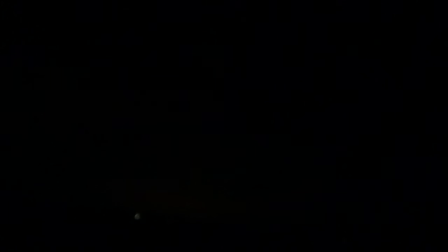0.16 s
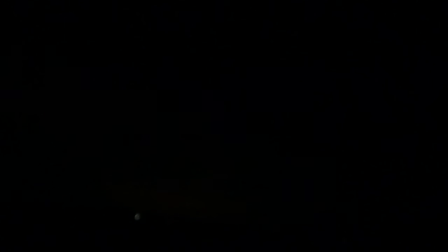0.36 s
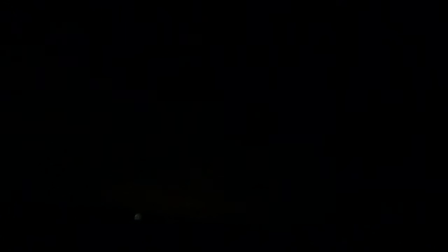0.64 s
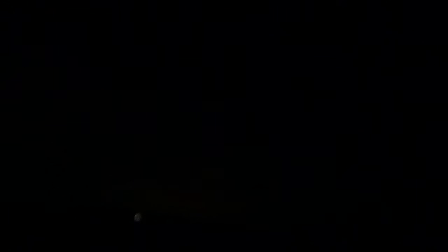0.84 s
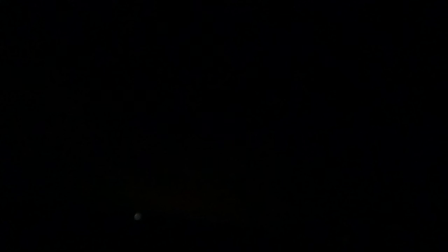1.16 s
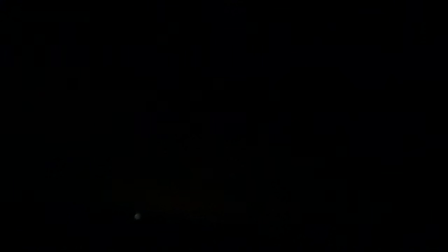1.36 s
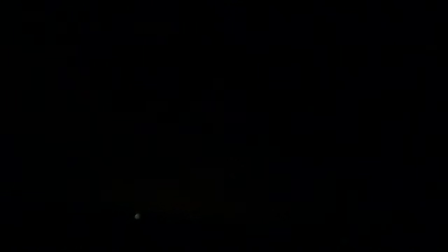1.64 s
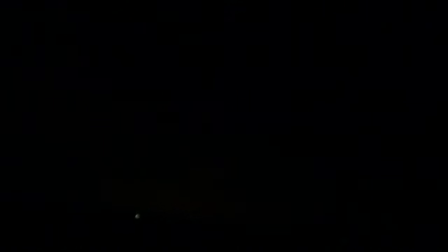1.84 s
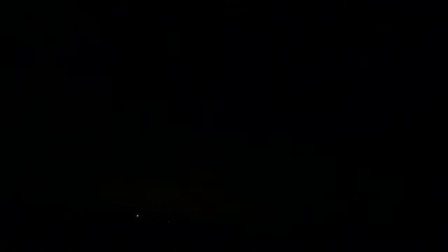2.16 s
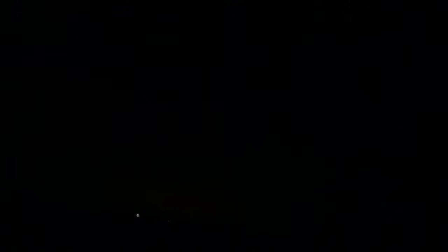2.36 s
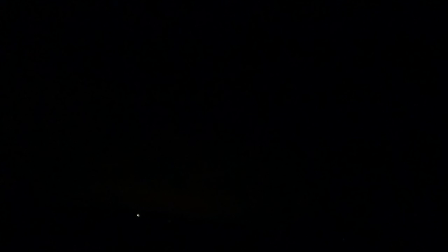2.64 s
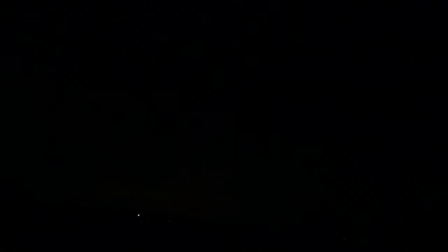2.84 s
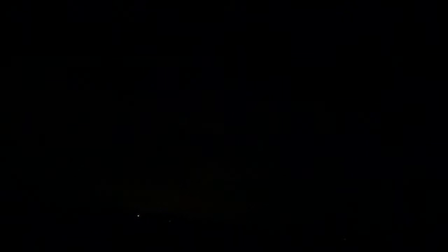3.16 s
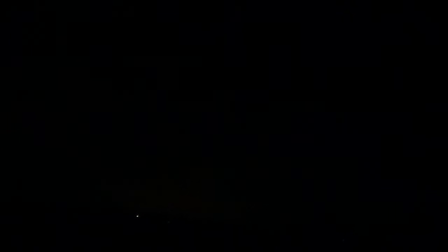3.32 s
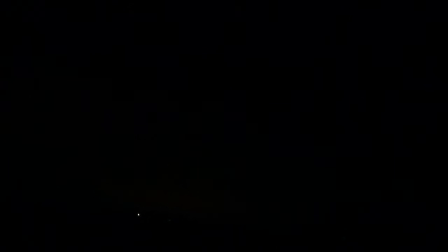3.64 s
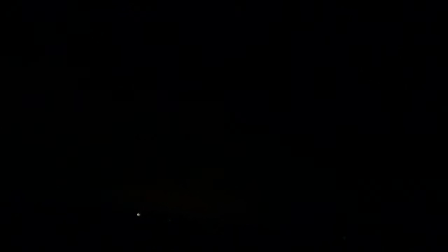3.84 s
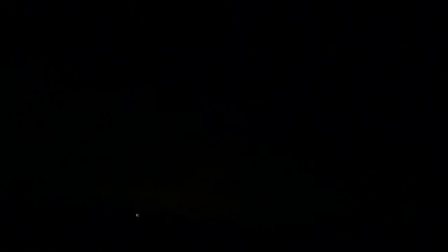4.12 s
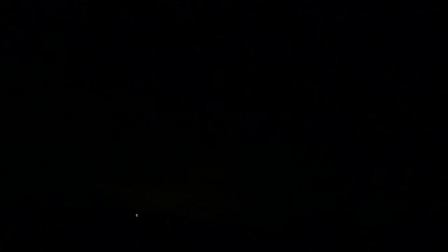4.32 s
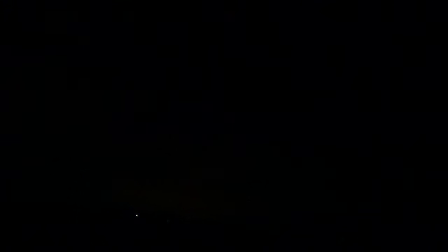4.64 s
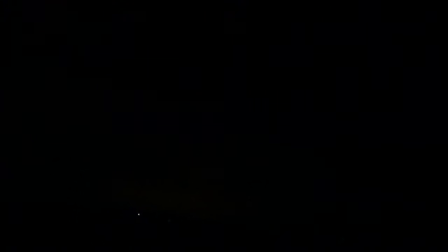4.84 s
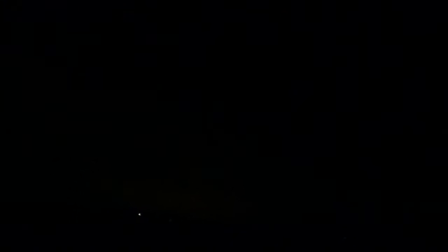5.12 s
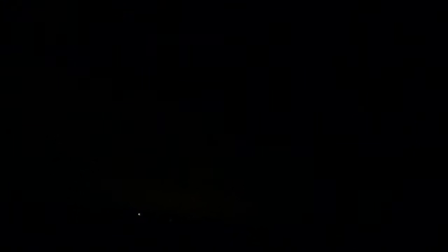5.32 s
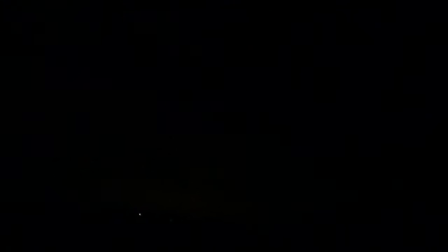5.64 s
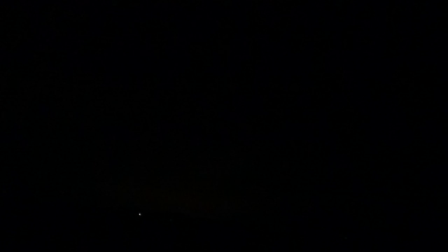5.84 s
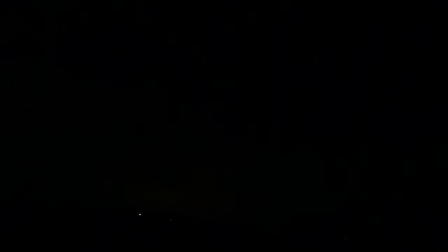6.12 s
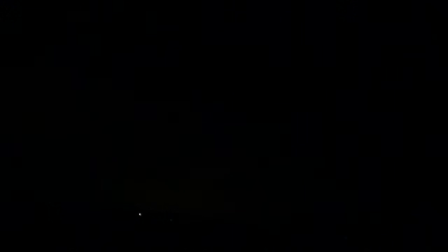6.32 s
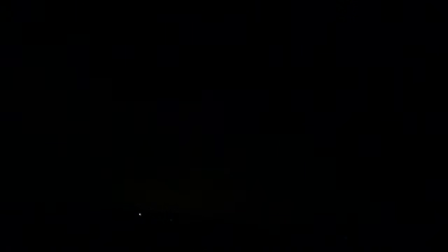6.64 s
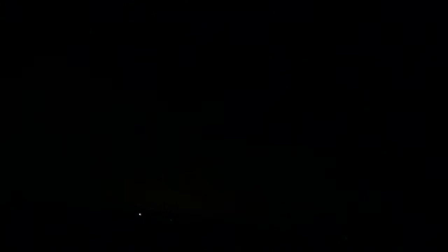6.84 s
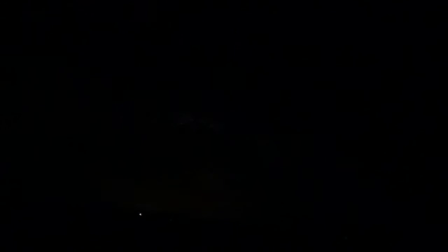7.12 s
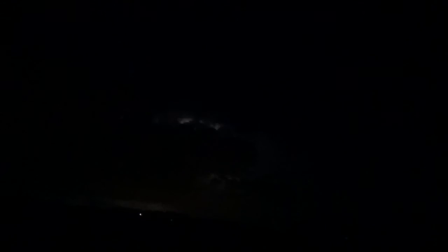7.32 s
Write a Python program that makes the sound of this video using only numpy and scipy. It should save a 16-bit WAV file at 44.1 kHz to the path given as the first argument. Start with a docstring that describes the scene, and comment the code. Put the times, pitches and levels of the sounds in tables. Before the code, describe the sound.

Night insects sizzle high and constant, one rasping nearby, with sharp plastic clicks, small scuffs and a run of soft finger rubs up close.

```python
"""A near bush cricket is heard first, rasping 19 wing strokes a second over a far chorus of its kind.
Its scraper rings the wing tooth by tooth; the chorus is dense random impacts through a band spectrum.
Fingers handle a plastic case: damped modes ring at sharp clicks, and filtered grains of friction make
scuffs and a run of soft rubs. A few soft low blips sound between them.
Underneath lie shaped noise for night air and distant traffic, and a faint wavering tone."""
import sys
import numpy as np
from scipy import signal
from scipy.fft import rfft, irfft, next_fast_len
from scipy.io import wavfile

SR = 44100
rng = np.random.default_rng(int(sys.argv[2]) if len(sys.argv) > 2 else 0)


def inscribe(sig):
    """Save sig as 16-bit PCM at rate SR to the path in sys.argv[1].

    A 1-D sig is mono; a 2-D sig holds one channel per row.
    Samples are clipped to [-1, 1] before scaling.
    """
    pcm = np.round(np.clip(np.atleast_2d(sig).T, -1, 1) * 32767)
    wavfile.write(sys.argv[1], SR, pcm.astype(np.int16))


N = 329427
TIME = np.arange(N) / SR


def amp(db):
    """Level law: decibels to amplitude gain."""
    return 10 ** (np.asarray(db) / 20)


def unit(x):
    """Normalisation: scales to rms 1."""
    return x / np.sqrt(np.mean(x ** 2) + 1e-20)


def curve(rows, at):
    """Linear interpolation of a time table."""
    return np.interp(at, *np.transpose(rows))


def read(points, hz):
    """Interpolation of a spectrum table on a log-frequency axis."""
    f, value = np.transpose(points)
    return np.interp(np.log(hz + 1), np.log(f + 1), value)


def colour(x, points):
    """Zero-phase filtering by a spectrum table."""
    length = x.shape[-1]
    size = next_fast_len(length)
    gain = amp(read(points, np.fft.rfftfreq(size, 1 / SR)))
    return irfft(rfft(x, size) * gain, size)[..., :length]


def colour_hit(x, points):
    """Minimum-phase filtering by a spectrum table: no sound ahead of the attack."""
    length = x.shape[-1]
    size = next_fast_len(2 * length)
    log_gain = np.log(amp(read(points, abs(np.fft.fftfreq(size, 1 / SR)))))
    # the Hilbert transform of the log gain supplies the phase
    response = np.exp(signal.hilbert(log_gain).conj())
    return np.fft.ifft(np.fft.fft(x, size) * response).real[..., :length]


def drift(per_s):
    """Slow random modulation of rms 1: straight lines between chance knots."""
    knots = rng.standard_normal(2000)
    return unit(np.interp(TIME * per_s, np.arange(len(knots)), knots))


def pair(two, same, left_db=0):
    """Interchannel coherence: mid-side mixing makes two unrelated signals partly alike."""
    same = np.clip(same, 0, 1)
    mid = np.sqrt((1 + same) / 2) * two[0]
    side = np.sqrt((1 - same) / 2) * two[1]
    return np.array([(mid + side) * amp(left_db / 2), (mid - side) * amp(-left_db / 2)])


def add(mix, s, sound):
    """Superposition: mixes a stereo sound in at a time in seconds."""
    part = mix[:, max(round(s * SR), 0):][:, :sound.shape[1]]
    part += sound[:, :part.shape[1]]


def grains(per_s, spread_db, size=N):
    """Shot noise: two random trains of tiny impacts of uneven size."""
    heights = rng.standard_normal((2, size)) * amp(spread_db * rng.standard_normal((2, size)))
    return heights * (rng.random((2, size)) < per_s / SR)


STROKES_PER_S = 19
# wandering of the wing beat: t/s, lag behind an even beat/s
BEAT_LAG = [(0, .006), (.53, .0085), (1.58, .003), (2.1, -.0046), (2.63, -.0055), (3.5, .003),
            (4.21, -.0033), (6.3, -.0027), (7.4, -.0052)]
# effort of singing, with one broad swell: t/s, relative level/dB
SINGING_EFFORT = [(0, -0.3), (.8, .3), (1.55, -1), (3, 1.9), (3.6, 2), (4.4, -0.4), (6, -0.4), (7.45, 0.8)]
# radiation of the wing: f/Hz, relative level/dB
WING_SPECTRUM = [(4500, -22), (6300, -9), (7000, 3), (7500, -2), (7830, 4.5), (8150, -1.5), (8480, -2.5),
                 (8780, 3.5), (9080, -6.5), (9280, 1), (9900, -1), (10900, 10.5), (13000, -34)]


def cricket(count=11, level_db=-41.0):
    """Stridulation: a scraper crosses a toothed file, each tooth exciting a short wing resonance."""
    first_gap_s, gap_growth_s, lead_s = .00108, .00019, .0094
    loudest_s, swell_s, uneven_db = 0.00015, 0.0063, 0.4
    first_hz, last_hz, tooth_s = 9000, 8100, 0.00027
    beat = np.arange(int(N / SR * STROKES_PER_S) + 1) / STROKES_PER_S
    beat = beat + curve(BEAT_LAG, beat)
    chance = rng.standard_normal((len(beat), 4, count))

    # the teeth strike ever slower on average, swelling and fading within a stroke
    gaps = (first_gap_s + gap_growth_s * np.arange(count)) * (1 + .1 * chance[:, 0])
    within = np.cumsum(gaps, 1) - lead_s + .0003 * chance[:, 1, :1]
    stroke_db = curve(SINGING_EFFORT, beat)[:, None] + .5 * chance[:, 1, 1:2]
    swell = 1 / (1 + ((within - loudest_s) / swell_s) ** 2)
    force = amp(stroke_db + uneven_db * chance[:, 2]) * swell

    # every tooth rings the wing for a few cycles, later teeth lower
    hz = np.linspace(first_hz, last_hz, count) + 150 * chance[:, 3]
    offset = np.arange(-SR // 1000, SR // 1000)
    ringing = np.cos(2 * np.pi * hz[..., None] * offset / SR)
    pips = force[..., None] * ringing / np.cosh(offset / SR / tooth_s) ** 2
    at = ((beat[:, None] + within) * SR).astype(int)[..., None] + offset
    inside = (at >= 0) & (at < N)
    direct = unit(colour(np.bincount(at[inside], pips[inside], N), WING_SPECTRUM))

    # the nearest leaves blur each strike, farther ones scatter a short diffuse tail
    t = TIME[:SR // 10]
    song = direct * amp([[-.5], [.5]])
    for db, t60, same in [(-14, .012, .8), (-11, .09, .5)]:
        leaves = pair(rng.standard_normal((2, len(t))), same) * amp(-60 * t / t60)
        scattered = signal.oaconvolve(direct[None], leaves * (t > .0006), axes=1)[:, :N]
        song = song + amp(db) * unit(scattered)
    return amp(level_db) * unit(song)


# modes of the plastic case before detuning and damping: f/Hz, relative level/dB, t60/s
CASE_MODES = [(185, -22.5, 0.15), (260, -21.5, 0.32), (741, -8, 0.078), (790, -12, 0.12), (1000, 1, 0.048),
              (1177, -1.5, 0.074), (1333, -2, 0.064), (1460, -1, 0.071), (1645, 2.5, 0.043),
              (1900, 5.5, 0.04), (2286, 1.5, 0.041), (2460, -4.5, 0.066), (2780, -7.5, 0.054),
              (2980, 4.5, 0.015), (3040, -26.5, 0.13), (3450, -4.5, 0.038), (3860, -10, 0.037),
              (4250, -2, 0.03), (4630, -0.5, 0.029), (4800, -28, 0.046), (6400, 0, 0.015), (7730, 3, 0.012),
              (8770, 4.5, 0.0086), (10250, -31, .01)]
# loose after-rattle of the case: f/Hz, relative level/dB
RATTLE_SPECTRUM = [(300, 5.5), (900, 12), (1500, 11), (2400, 11), (3300, 5.5), (8000, -8)]
# clicks: t/s, relative level/dB, f/Hz that the touched spot rings most, ring time/factor,
# thump of a firm press/dB, brightness of a hard contact/dB
CASE_CLICKS = [(1.119, -18, 2850, 0.53, -7, 15.5), (1.2083, -13, 2880, 0.72, 3.5, 4),
               (1.3272, -14, 2300, 0.7, 4.5, 7.5), (2.7661, -23.5, 1420, 0.73, -8, -6),
               (2.7757, -31, 1200, .67, -2, -2), (3.648, -13.5, 2300, 0.67, 2.5, 4),
               (4.0731, -35.5, 1700, .4, -7, -10), (4.0993, -33.5, 1900, 1.3, 0, -1),
               (4.1538, -39.5, 2000, .82, 5, -2), (4.2982, -17, 1880, 0.55, -12, 0.5),
               (4.7964, -33, 1400, .6, -2, -15), (4.812, -20, 1470, 0.55, -6.5, -3)]


def clicks(level_db=-9):
    """Modal synthesis: a snap and a brief rattle with damped case modes, detuned anew at each click."""
    crack_t60, crack_db, tail_t60, tail_db = 0.014, 7, 0.31, -21
    rise_s, spot_db, grip_detune = 0.0001, 4, 0.013
    snap_db, snap_s = 19, .000045
    out, t = np.zeros((2, N)), TIME[:SR // 4]
    u = (t - .0004) / snap_s
    snap = amp(snap_db) * u * np.exp(-u ** 2)
    for s, click_db, spot_hz, ring_time, thump_db, bright_db in CASE_CLICKS:
        ring, age = np.zeros((2, len(t))), t / ring_time
        for hz, db, t60 in CASE_MODES:
            near = np.exp(-(np.log2(hz / spot_hz) / 0.25) ** 2)  # modes at the touched spot answer best
            turns = hz * (1 + grip_detune * rng.standard_normal()) * t + rng.random((2, 1))
            ring += amp(db + spot_db * near - 60 * age / t60) * np.sin(2 * np.pi * turns)
        chatter = rng.standard_normal((2, len(t)))
        crack = chatter * amp(crack_db - 60 * age / crack_t60)
        tail = colour(chatter, RATTLE_SPECTRUM) * amp(tail_db - 60 * age / tail_t60)
        blow = snap + pair(ring + crack + tail, 0.74) * (1 - np.exp(-t / rise_s))
        # a firm press moves the whole case; a hard contact wakes its upper modes
        contact = [(50, -37), (170, thump_db), (720, thump_db), (1050, 0), (1900, -3),
                   (3000, bright_db), (4500, bright_db - 1), (7000, bright_db),
                   (11000, bright_db - 5), (14000, -37)]
        blow = colour_hit(blow, contact)
        attack_rms = np.sqrt(np.mean(blow[:, :SR // 100] ** 2))  # over the first 10 ms
        add(out, s, blow * amp(click_db + level_db) / attack_rms)
    return out


# finger scuffs: t/s, length/s, level/dB, centre f/Hz, steepness of the skirt below centre/(dB per octave)
FINGER_SCUFFS = [(0.205, 0.019, -58.5, 2500, 5), (0.558, .018, -60, 2000, 9), (0.618, .032, -62, 1700, 10),
                 (1.365, 0.027, -56.5, 1500, 6), (1.968, 0.03, -56.5, 2400, 5),
                 (2.018, 0.028, -55.5, 2660, 12), (2.085, 0.026, -59.5, 2670, 17),
                 (2.719, 0.015, -52, 1360, 11), (2.743, .036, -40, 1300, 4), (4.747, 0.031, -57.5, 1180, 8),
                 (4.782, 0.056, -44.5, 1300, 0.5), (6.167, 0.038, -59, 1380, 8),
                 (6.546, .012, -56.5, 2600, 27), (6.666, 0.012, -61, 3100, 18), (6.896, .025, -63, 1500, 8),
                 (7.148, 0.012, -55.5, 2860, 31)]


def scuffs():
    """Stick-slip friction: skin catches on the case in brief clusters of tiny slips."""
    out = np.zeros((2, N))
    for s, length, db, hz, skirt_db in FINGER_SCUFFS:
        shape = [(hz / 8, -3 * skirt_db), (hz, 0), (hz * 3, -1.6 * skirt_db), (hz * 6, -5 * skirt_db)]
        slips = colour(grains(7000, 6.4, size=SR // 10), shape)
        stroke = slips[:, :int(length * SR)]
        stroke = unit(stroke * signal.windows.tukey(stroke.shape[1], .7))
        add(out, s, amp(db) * pair(stroke, 0.89))
    return out


# finger pushes over the case: start t/s, length/s, level before fading/dB, hiss against the rub/dB
FINGER_RUBS = [(2.857, 0.28, -53.5, 0), (3.104, 0.14, -53.5, 1.5), (3.244, 0.32, -46.5, -2),
               (3.551, 0.24, -48.5, -5), (3.829, 0.099, -51, -13), (3.932, .15, -48.5, -7.5)]
# body of the rub: f/Hz, relative level/dB
SKIN_SPECTRUM = [(200, -7.5), (620, -16), (780, 1.5), (970, -4), (1130, 7), (1300, 2), (2000, 4),
                 (2150, -1.5), (2580, -1), (2830, 2.5), (3450, -8), (5000, -14), (8000, -30)]
# fine hiss of skin on plastic: f/Hz, relative level/dB
HISS_SPECTRUM = [(2500, -10.5), (3450, -3), (3720, 2), (4200, -2), (4580, 1), (4850, -5), (5400, -2),
                 (6100, -7), (8000, -31)]
RUB_ATTACK_S, RUB_RELEASE_S = 0.049, 0.079
RUB_FADE_DB_PER_S, HISS_FADE_DB_PER_S = 9.5, 31  # as the finger slows, the hiss dies first


def rubs(stick_db=1):
    """Sliding friction: grain noise swells and fades with each push, its level flickering by stick-slip."""
    rub_gain, hiss_gain = np.zeros((2, N))
    for s, length, db, hiss_db in FINGER_RUBS:
        age = np.clip(TIME - s, 0, 1)
        press = np.clip(age / RUB_ATTACK_S, 0, 1)
        let_go = np.clip((length - age) / RUB_RELEASE_S + .5, 0, 1)
        touch = press * let_go
        rub_gain += touch * amp(db - RUB_FADE_DB_PER_S * age)
        hiss_gain += touch * amp(db + hiss_db - HISS_FADE_DB_PER_S * age)
    rub = rub_gain * unit(colour(grains(6000, 1), SKIN_SPECTRUM))
    hiss = hiss_gain * unit(colour(grains(5400, 1.2), HISS_SPECTRUM))
    return amp(stick_db * drift(60)) * pair(rub + hiss, 0.5)


# faint low blips: centre t/s, f/Hz, level/dB
LOW_BLIPS = [(1.425, 580, -57), (1.514, 537, -52.5), (1.792, 480, -55.5), (1.826, 795, -57)]


def blips(length_s=0.0145):
    """Windowed tone bursts: soft low notes of a few cycles."""
    out, t = np.zeros((2, N)), TIME[:int(length_s * SR)]
    for s, hz, db in LOW_BLIPS:
        note = amp(db) * unit(np.hanning(len(t)) * np.sin(2 * np.pi * hz * t))
        add(out, s - length_s / 2, np.array([note, note]))
    return out


# far chorus: f/Hz, relative level/dB
CHORUS_SPECTRUM = [(4500, -35), (5800, -21.5), (6400, -16), (6900, -7), (7400, 2), (8300, 0), (9000, 1.5),
                   (9700, -0.5), (10400, -4.5), (11000, -12), (13000, -88)]


def chorus(level_db=-42.0):
    """Superposition of many sources: far tooth strikes merge into a gently restless sizzle."""
    strikes = unit(colour(grains(18000, 2.2), CHORUS_SPECTRUM))
    restless_db = 0.62 * drift(45) + 0.21 * drift(2.8)
    return amp(level_db + restless_db) * pair(strikes, 0.71, left_db=-2.0)


# night air: f/Hz, relative level/dB
AIR_SPECTRUM = [(15, -34), (25, -14.5), (60, 5), (113, 1), (152, -3.5), (313, -4.5), (367, 0.5),
                (401, -8.5), (429, -6.5), (705, -8.5), (772, -8), (1010, -2.5), (1860, -8), (2330, -7.5),
                (5500, -13.5), (7150, -35), (12100, -120)]
# distant traffic: f/Hz, relative level/dB
ROAD_SPECTRUM = [(40, -32), (90, -4.5), (300, 0.5), (520, -7.5), (800, -4.5), (1400, -46), (4000, -70)]
# left-right likeness of the air: f/Hz, coherence/(0 to 1)
AIR_COHERENCE = [(60, 1), (130, 0.91), (270, 0.91), (560, 0.32), (1200, 0.12), (2500, 0.15), (5500, 0.51)]
AIR_DB = -58.5
ROAD_DB, ROAD_FADE_DB_PER_S = -59, 0.79  # the traffic slowly recedes


def air_and_traffic():
    """Diffuse-field coherence: shaped noise, almost mono in the bass, for air and distant traffic."""
    hz = np.fft.rfftfreq(N, 1 / SR)
    noise = irfft(pair(rfft(rng.standard_normal((2, N))), read(AIR_COHERENCE, hz)), N)
    air = amp(AIR_DB) * unit(colour(noise, AIR_SPECTRUM))
    road_db = ROAD_DB - ROAD_FADE_DB_PER_S * TIME + 0.29 * drift(5.49)
    return air + amp(road_db) * unit(colour(noise, ROAD_SPECTRUM))


# the hum comes and goes: t/s, mean peak level/dB
HUM_LEVEL = [(0, -80), (1, -65), (2.8, -66), (5.6, -74), (6.5, -63.5), (7.4, -89)]


def hum():
    """Frequency modulation: a faint tone near 404 Hz wavers in pitch and level."""
    phase = 2 * np.pi * np.cumsum(404 + 2 * drift(12)) / SR
    return np.sin(phase) * amp(curve(HUM_LEVEL, TIME) + drift(2.7))


def scene():
    """Superposition of the insects, the handled case and the night background."""
    near = cricket() + clicks() + scuffs() + rubs() + blips()
    return near + chorus() + air_and_traffic() + hum()


EDGE_HZ = 11100


def record(dry):
    """Band limiting: a steep linear-phase low-pass."""
    lowpass = signal.firwin(601, EDGE_HZ, window=("kaiser", 8), fs=SR)
    return signal.oaconvolve(dry, lowpass[None], "same")


dry = scene()
out = record(dry)
inscribe(out)
```